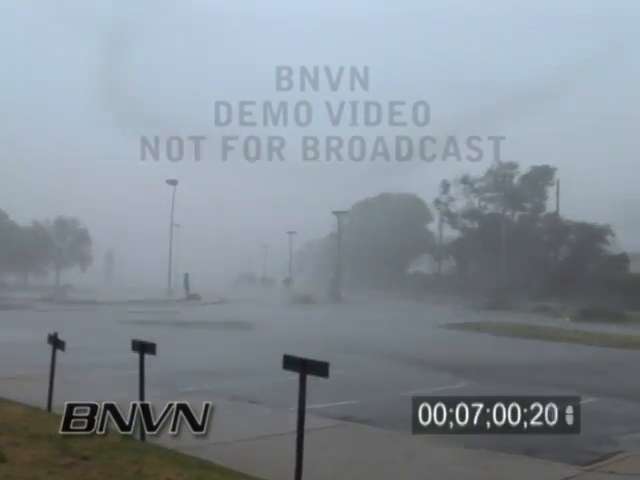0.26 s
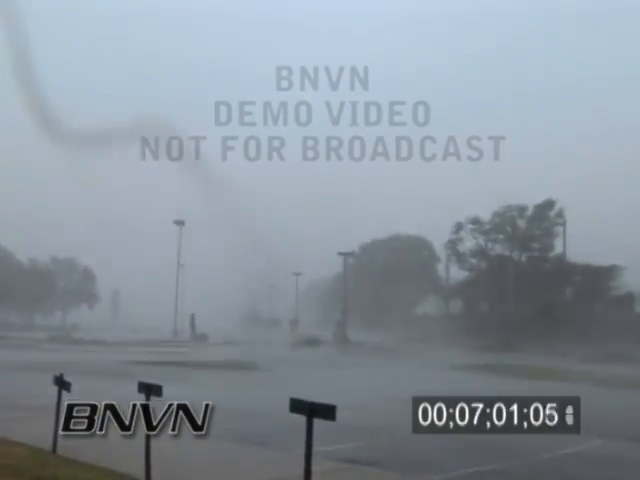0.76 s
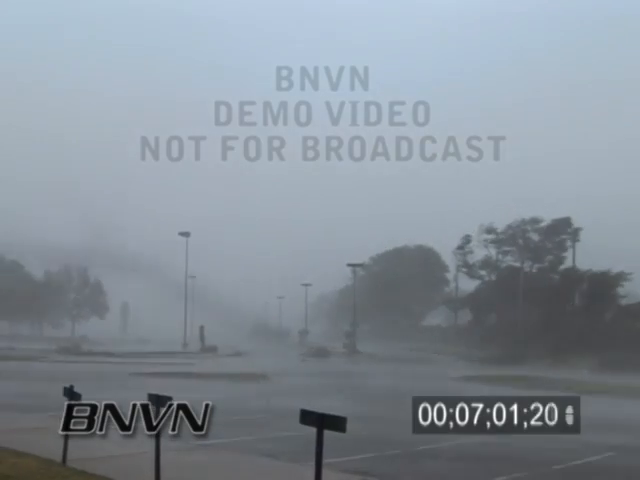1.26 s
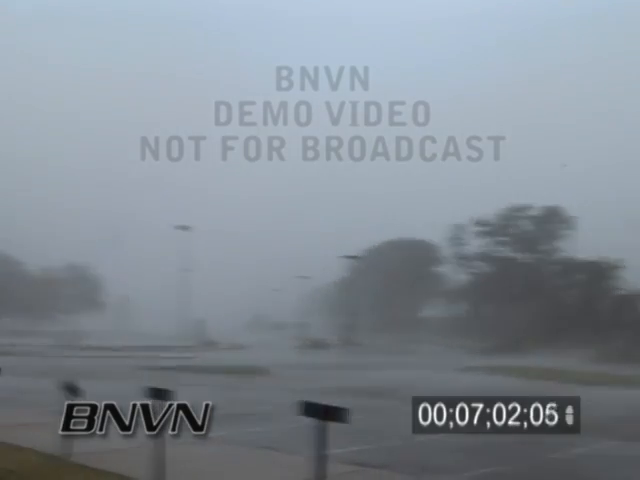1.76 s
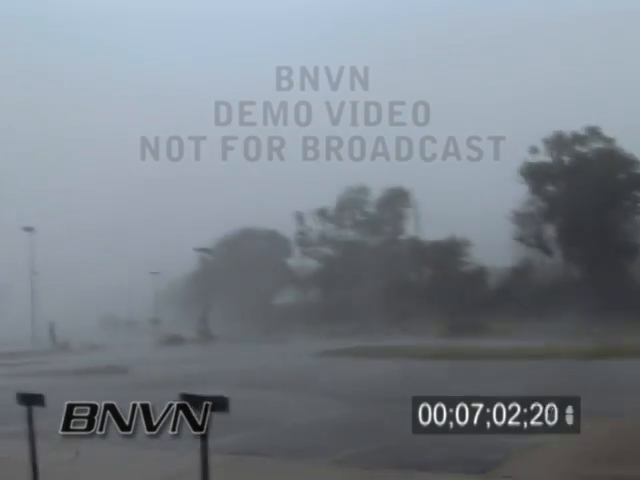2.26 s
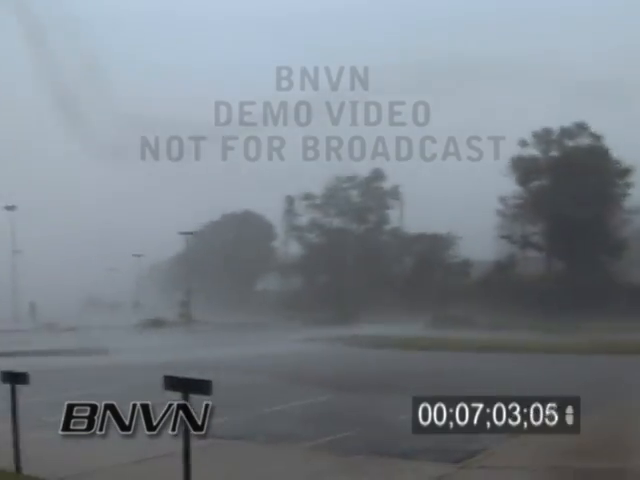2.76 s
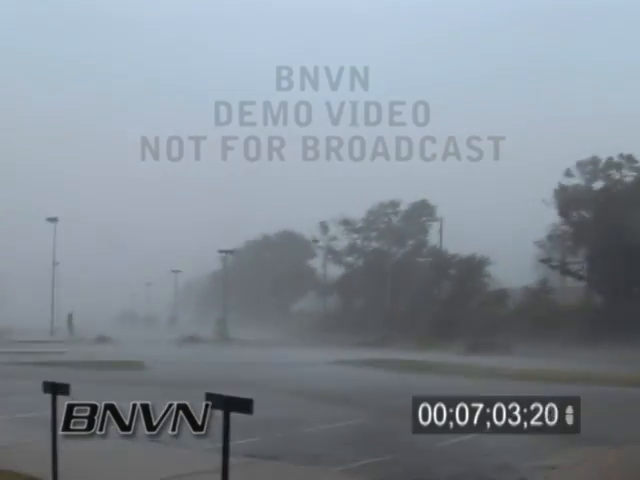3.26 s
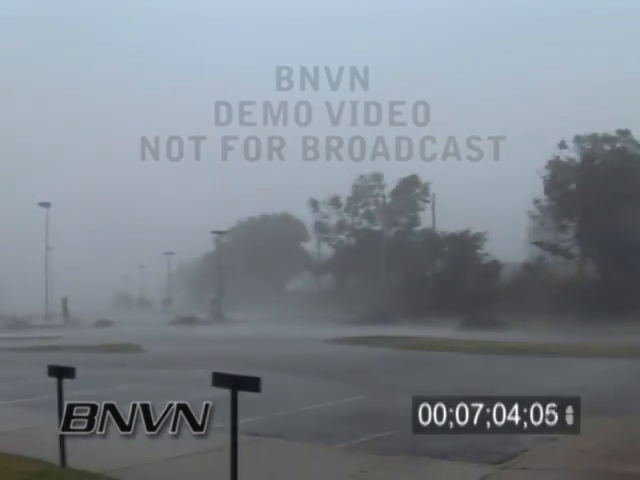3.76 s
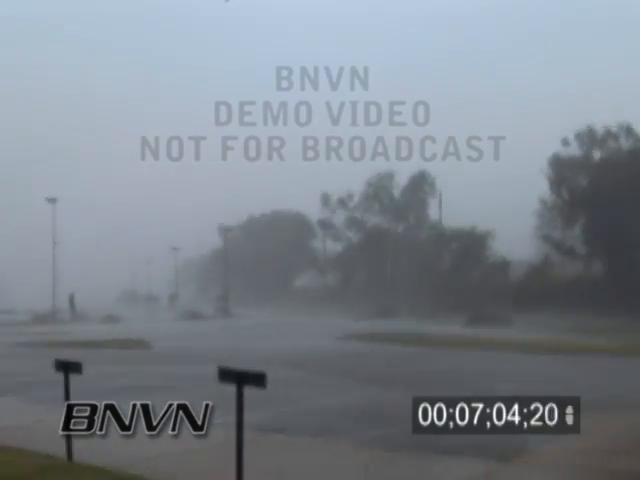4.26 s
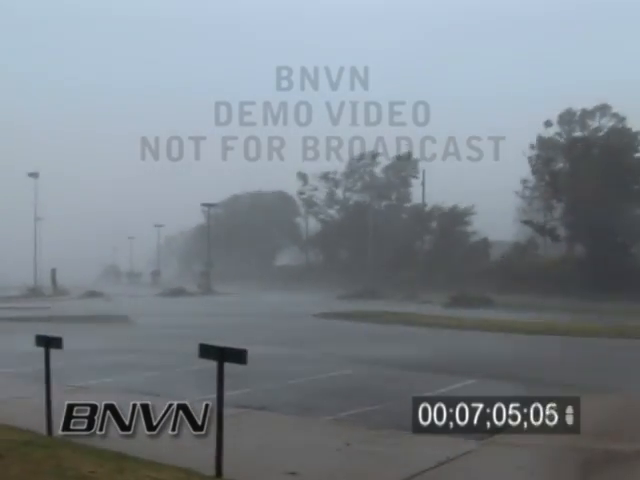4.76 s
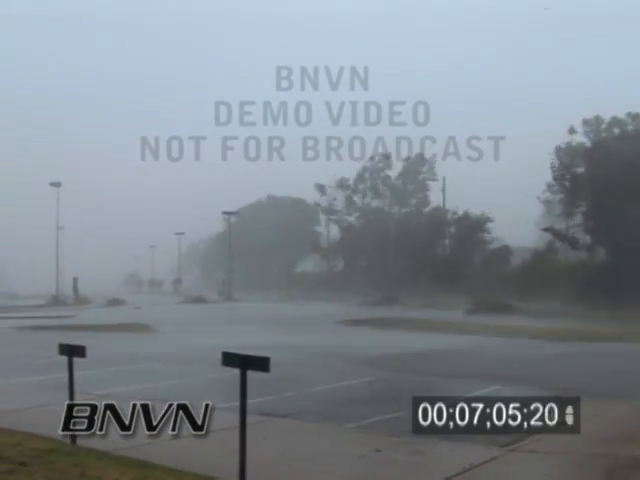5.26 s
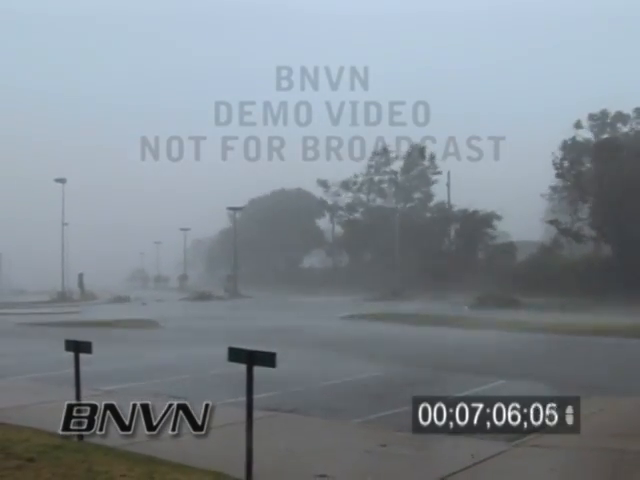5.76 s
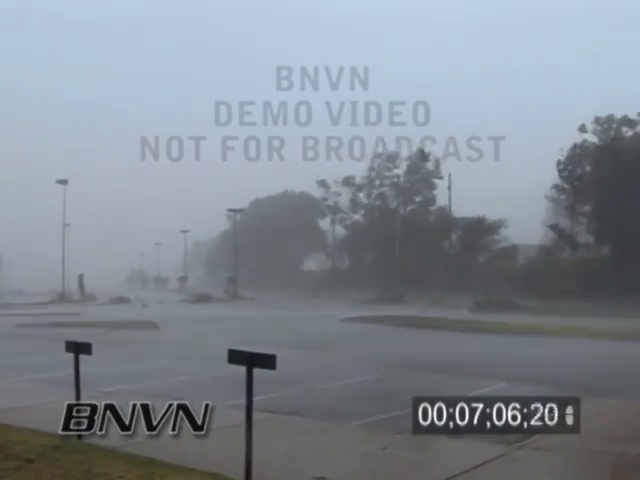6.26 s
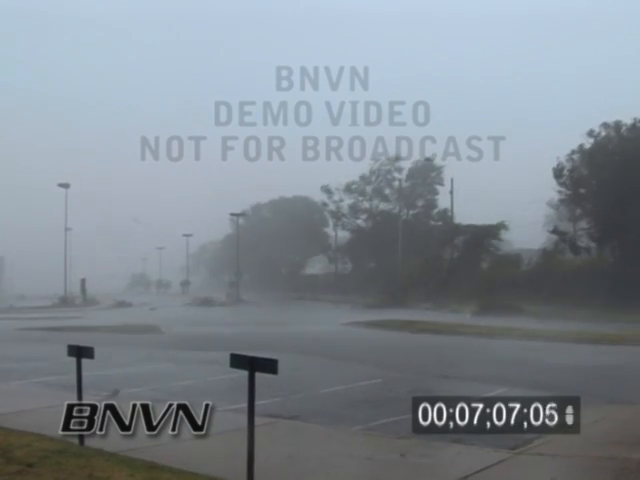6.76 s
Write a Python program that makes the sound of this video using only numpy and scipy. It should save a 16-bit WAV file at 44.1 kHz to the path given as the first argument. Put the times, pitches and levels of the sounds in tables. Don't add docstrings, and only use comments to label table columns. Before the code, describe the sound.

Strong storm wind roars steadily through trees across an open car park while blown rain hisses and low gusts rumble against the microphone.

```python
import sys
import numpy as np
from scipy import signal
from scipy.fft import rfft, irfft, next_fast_len
from scipy.io import wavfile
from scipy.ndimage import uniform_filter1d

SR = 44100
rng = np.random.default_rng(int(sys.argv[2]) if len(sys.argv) > 2 else 0)


def ratio_of_db(decibels):
    return 10 ** (np.asarray(decibels, float) / 20)


def master(y):
    cut = np.clip(np.atleast_2d(y).T, -1, 1)
    pcm = np.round(cut * 32767)
    wavfile.write(sys.argv[1], SR, pcm.astype(np.int16))


N = 309141
HZ = np.fft.rfftfreq(next_fast_len(N), 1 / SR)
CONTROL_STEP = 40

# (frequency [Hz], level [dB])
RUMBLE_SPECTRUM = [(11, -37), (18, -10), (48, -1), (112, 1), (235, -5), (290, -10), (363, -9), (420, -13.5),
                   (550, -37), (920, -120)]
# (frequency [Hz], level [dB])
ROAR_SPECTRUM = [(200, -20), (300, -6.5), (500, -2), (800, -3.5), (1000, -2), (1250, -3.5), (1550, 0),
                 (1850, -4), (2200, -5.5), (2600, -11), (3000, -20), (3600, -45)]
# (frequency [Hz], level [dB])
DRUMMING_SPECTRUM = [(2300, -13.5), (2900, -3.5), (3550, 1.5), (4100, -4.5), (4500, -6.5), (4800, -6),
                     (5100, -5.5), (5600, -9), (6200, -11), (6800, -18), (7000, -14), (7400, -23),
                     (8200, -45)]
# (frequency [Hz], level [dB])
SPRAY_SPECTRUM = [(6600, -34), (7300, -6), (7650, -5), (8100, -7), (8400, -4.5), (9000, -1), (9600, -2.5),
                  (10100, 0), (10600, -2), (11000, 0), (11600, -5.5), (11900, -16), (12100, -45)]
# (time [s], level [dB])
GUST = [(0.0, -24.5), (0.45, -25.5), (1.7, -22), (2.18, -24), (2.95, -23.5), (3.01, -21.5), (3.51, -23.5),
        (4.41, -25), (4.57, -26.5), (4.65, -23.5), (4.67, -24.5), (4.78, -25.5), (6.99, -25), (7.01, -24)]
# (time [s], level [dB])
DOWNPOUR = [
    (0.0, -52),
    (0.58, -51),
    (1.76, -47),
    (2.09, -49),
    (3.01, -47),
    (3.05, -45),
    (3.36, -48),
    (4.2, -49.5),
    (4.41, -51),
    (7.01, -53.5),
]
# (time [s], rise [dB])
BUFFETS = [(1.19, 1.5), (2.56, 1), (2.81, 1), (2.93, -3.0), (3.0, 2), (3.43, -0.5), (3.51, 0.5),
           (3.63, -2.5), (3.75, 4), (4.57, -2), (4.94, 1), (5.62, -1), (5.76, 1.5), (6.11, 3), (6.21, -1),
           (6.52, 2.5)]
# (frequency [Hz], phase [half turns])
PORT_PHASE_LOW = [(100, 0.011), (200, 0.015), (330, 0.074), (500, .13), (900, .17), (1450, 0.11),
                  (1800, 0.19), (2200, 0.3), (2500, 0.21), (2700, 0.034), (3000, 0.002), (4120, 0.002)]
# (frequency [Hz], phase [half turns])
PORT_PHASE_MID = [(4290, .5), (4480, .84), (4640, 1.06), (4880, 1.5), (5120, 1.86), (5330, 2.1),
                  (5560, 2.5), (5950, 2.58), (6250, 2.8), (6600, 2.88), (6850, 2.86), (7050, 2.72)]
# (frequency [Hz], phase [half turns])
PORT_PHASE_HIGH = [(7460, 2.56), (7700, 2.57), (8150, 2.34), (8400, 2.5), (8700, 2.37), (9300, 2.68),
                   (9700, 2.36), (10300, 2.16), (10700, 2.1), (11100, 2.18), (11600, 2.21), (11900, 2.04)]
# (frequency [Hz], level [dB])
GATE_THRESHOLD = [(300, -25), (900, -17.5), (1450, -16), (2500, -14), (4000, -13), (4600, -11),
                  (5300, -11), (5900, -7.5), (6600, -9), (7300, -4.5), (8100, -4.5), (9300, -5.5),
                  (10500, -7.5), (11600, -7), (12000, -3)]


def housing_rumble(gust, downpour):
    seconds = np.arange(N) / SR
    level_db = -25.5 + 0.44 * gust + 0.5 * downpour + 0.45 * seconds
    return wind(level_db + buffeting(), RUMBLE_SPECTRUM, eddy_hz=2.1, eddy_db=-0.16)


def buffeting():
    rise_s, fall_s = 0.04, 0.039
    time_s, rise_db = np.transpose(BUFFETS)
    points = np.arange(0, N, CONTROL_STEP)
    late = points[:, None] / SR - time_s
    bell = np.exp(-(late / np.where(late < 0, rise_s, fall_s)) ** 2)
    return np.interp(np.arange(N), points, bell @ rise_db)


def tree_roar(gust_db):
    return wind(gust_db + 0.51, ROAR_SPECTRUM, eddy_hz=2.45, eddy_db=0.57)


def ground_drumming(gust, downpour):
    seconds = np.arange(N) / SR
    level_db = -34.0 + 0.26 * gust + 0.41 * downpour - 0.13 * seconds
    return rain(level_db, DRUMMING_SPECTRUM, per_s=16000., spread_db=0.0, sheet_db=1.3)


def spray_hiss(rain_db):
    return rain(rain_db + 0.3 + 2.3, SPRAY_SPECTRUM, per_s=18000., spread_db=2.0, sheet_db=0.2)


def wind(level_db, spectrum, eddy_hz, eddy_db):
    air = rng.standard_normal((2, N)) * ratio_of_db(eddy_db * drift(eddy_hz))
    return ratio_of_db(level_db) * coloured(air, spectrum)


def rain(level_db, spectrum, per_s, spread_db, sheet_db):
    sizes = ratio_of_db(spread_db * rng.standard_normal((2, N)))
    signs = rng.choice([-1, 1], (2, N))
    chance = per_s * ratio_of_db(sheet_db * drift(8.0)) / SR
    landed = rng.random((2, N)) < chance
    return ratio_of_db(level_db) * coloured(sizes * signs * landed, spectrum)


def ports(fields):
    steady = 0.25
    angle = at_hz(PORT_PHASE_LOW + PORT_PHASE_MID + PORT_PHASE_HIGH) * np.pi / 2
    stray = ratio_of_db(-22.0) * (HZ > PORT_PHASE_MID[0][0])
    total = filtered(fields[0], np.cos(angle) + 1j * stray)
    fixed_part = filtered(fields[0], -1j * steady * np.sin(angle))
    loose_part = filtered(fields[1], np.sqrt(1 - steady ** 2) * np.sin(angle) + 1j * stray)
    return total + (fixed_part + loose_part) * [[1], [-1]]


def coloured(x, spectrum):
    x = filtered(x, ratio_of_db(at_hz(spectrum)))
    return x / np.sqrt(np.mean(x ** 2))


def filtered(x, gain):
    size = next_fast_len(N)
    return irfft(rfft(x, size) * gain, size)[..., :N]


def at_hz(points):
    hz, value = np.transpose(points)
    return np.interp(np.log(HZ + 1), np.log(hz), value)


def in_time(points):
    time_s, level_db = np.transpose(points)
    return np.interp(np.arange(N) / SR, time_s, level_db)


def drift(rate_hz):
    pole = np.exp(-2 * np.pi * rate_hz * CONTROL_STEP / SR)
    settle = 2000
    white = rng.standard_normal(N // CONTROL_STEP + settle + 2)
    slow = signal.lfilter([1], [1, -2 * pole, pole * pole], white)[settle:]
    return np.interp(np.arange(N) / CONTROL_STEP, np.arange(len(slow)), slow / np.std(slow))


def smoothed(x, bins, frames):
    return uniform_filter1d(uniform_filter1d(x, size=bins, axis=-2), size=frames, axis=-1)


def scene():
    gust_db, rain_db = in_time(GUST), in_time(DOWNPOUR)
    gust, downpour = gust_db - gust_db.mean(), rain_db - rain_db.mean()
    winds = housing_rumble(gust, downpour) + tree_roar(gust_db)
    rains = ground_drumming(gust, downpour) + spray_hiss(rain_db)
    return ports(winds + rains)


def thinned(x):
    pair = np.array([x[0] + x[1], x[0] - x[1]]) / 2
    hz, _, cells = signal.stft(pair, SR, nperseg=2048, noverlap=1536)
    power = np.abs(cells) ** 2
    patch = smoothed(power, bins=4, frames=2)
    around = smoothed(power.sum(axis=0), bins=41, frames=5)
    threshold_db = np.interp(hz, HZ, at_hz(GATE_THRESHOLD))[:, None]
    waver = smoothed(rng.standard_normal(power.shape), bins=16, frames=4)
    waver_db = 4.0 * waver / np.std(waver)
    audible = patch > ratio_of_db(2 * (threshold_db + waver_db)) * around
    _, kept = signal.istft(cells * audible, SR, nperseg=2048, noverlap=1536)
    total, difference = kept[:, :N]
    return np.array([total + difference, total - difference])


def low_pass(x):
    return signal.sosfilt(signal.butter(12, 11990, fs=SR, output="sos"), x)


def record(dry):
    mix = thinned(dry)
    return low_pass(mix)


dry = scene()
out = record(dry)
master(out)
```